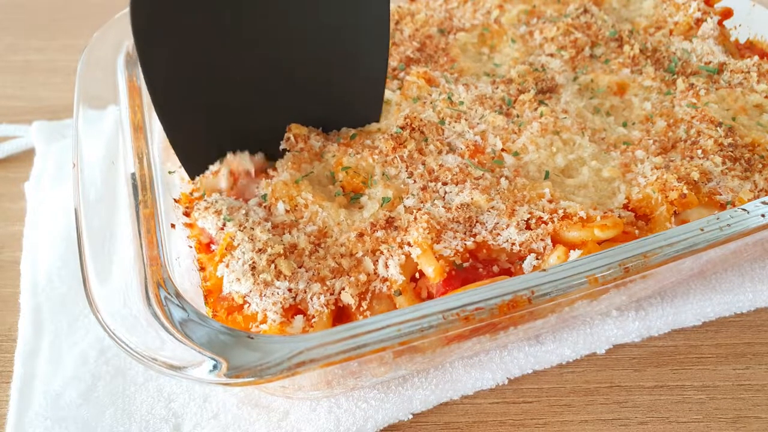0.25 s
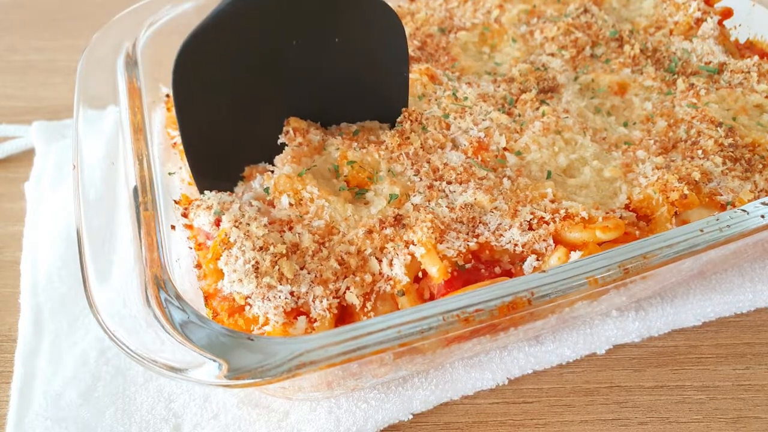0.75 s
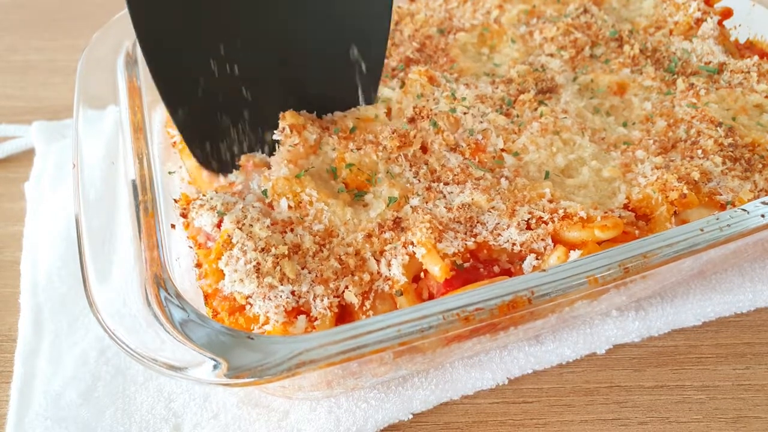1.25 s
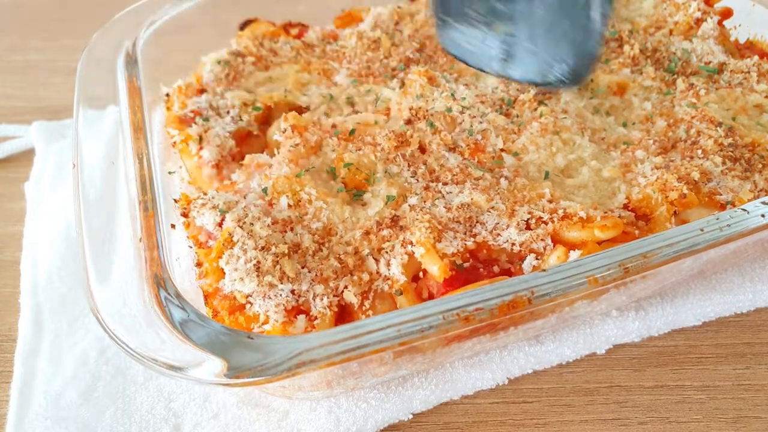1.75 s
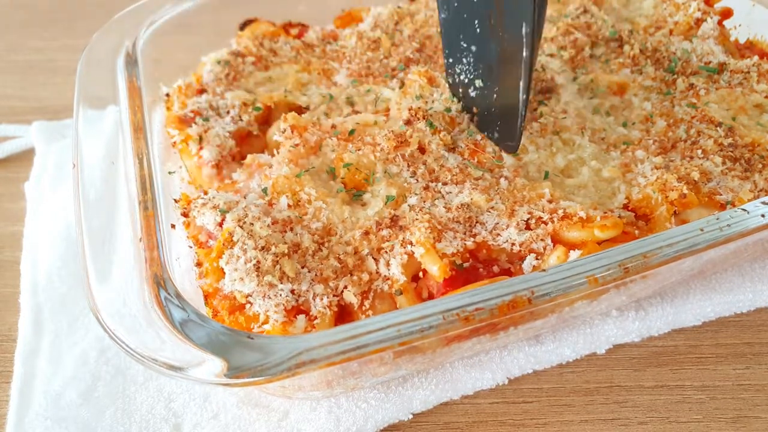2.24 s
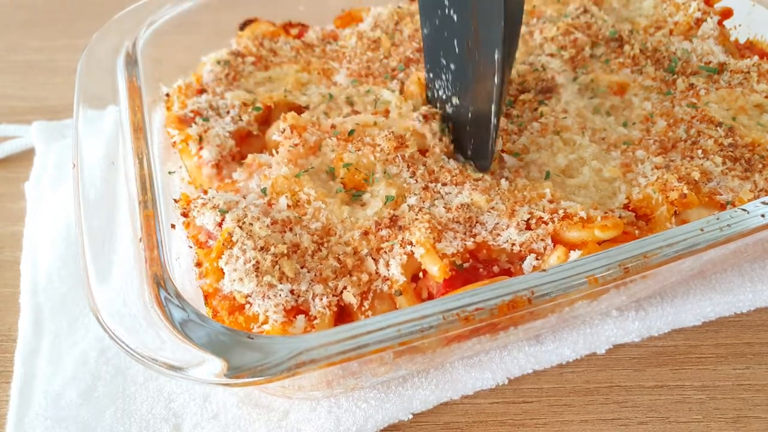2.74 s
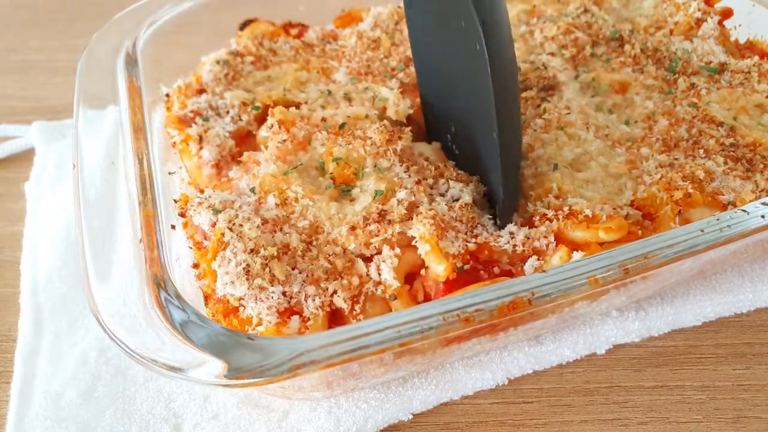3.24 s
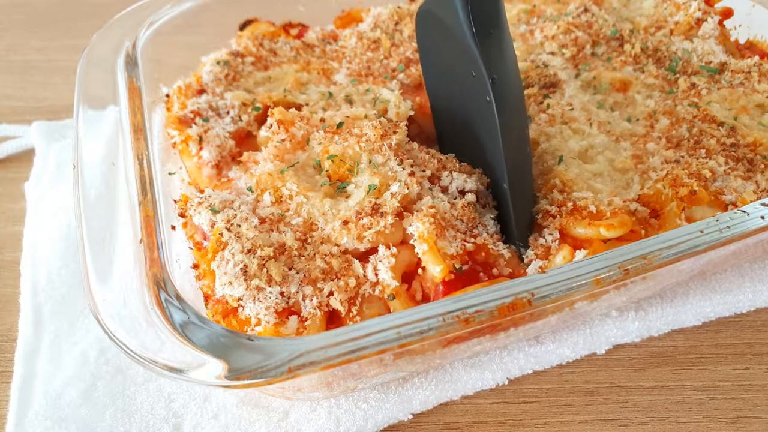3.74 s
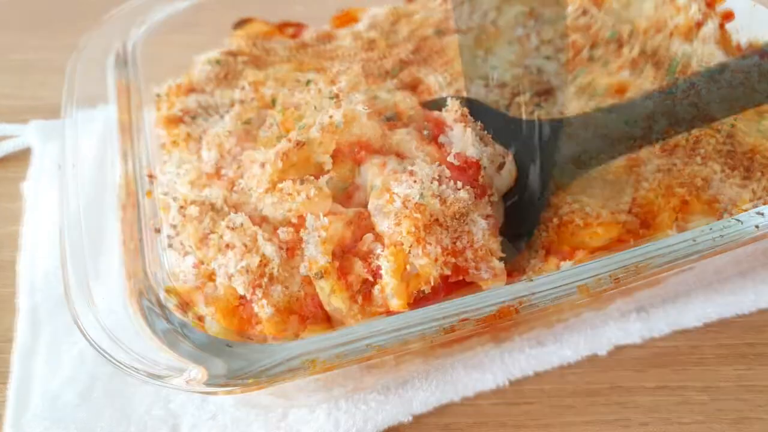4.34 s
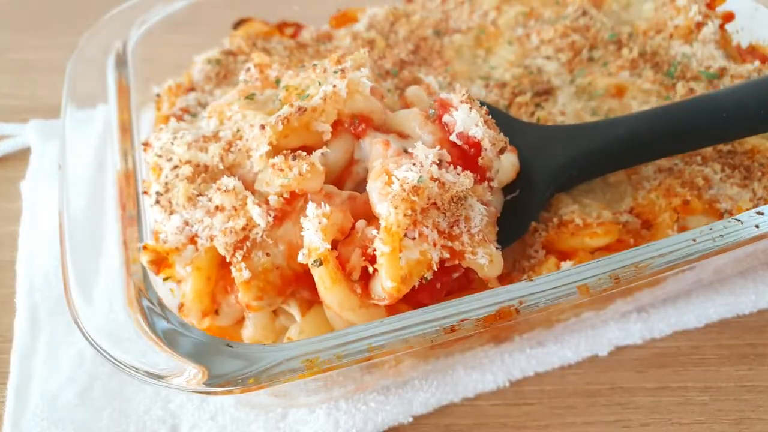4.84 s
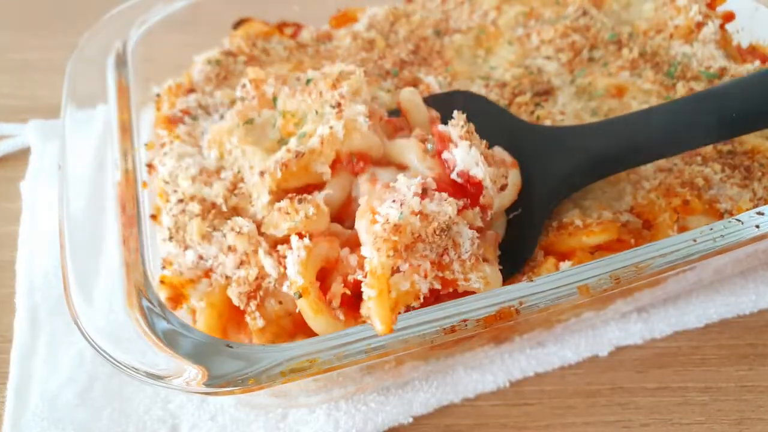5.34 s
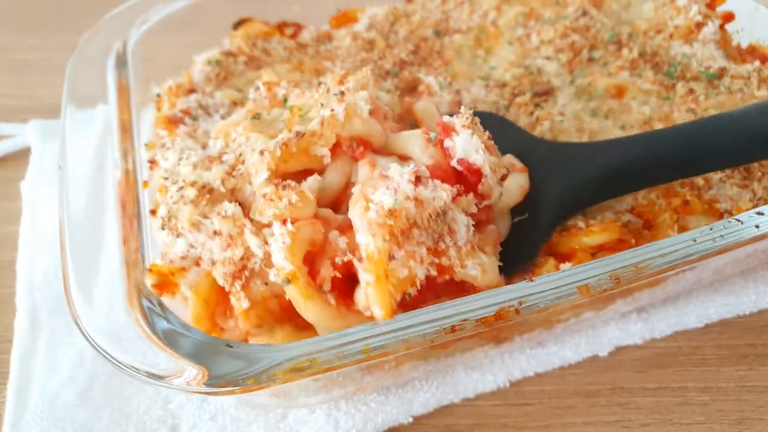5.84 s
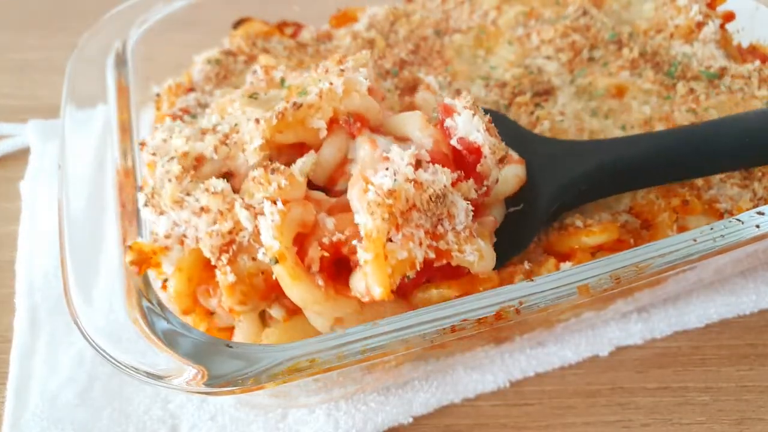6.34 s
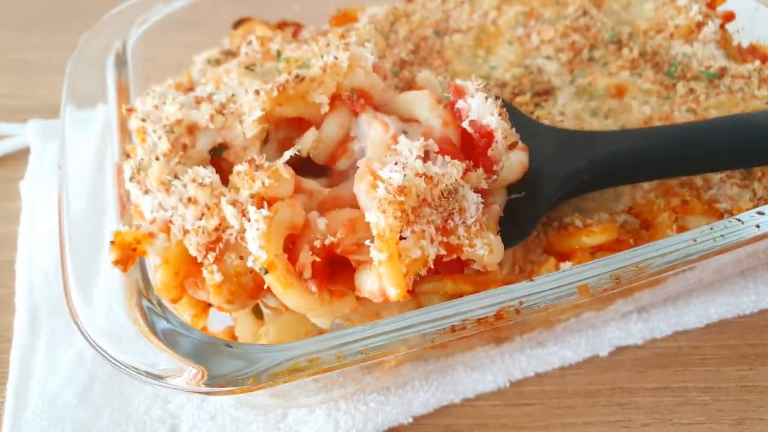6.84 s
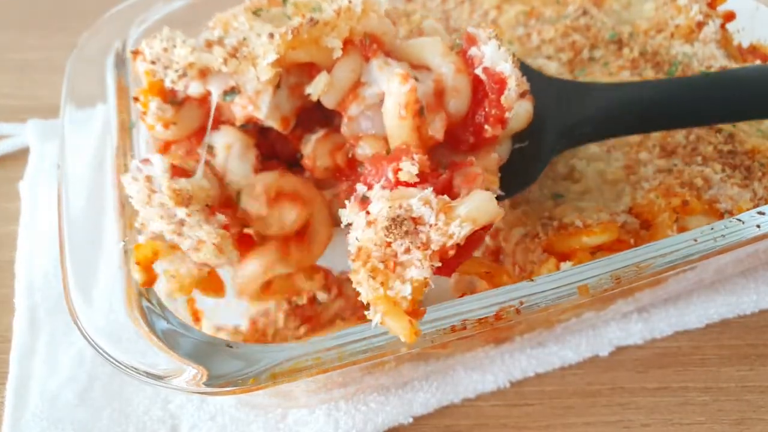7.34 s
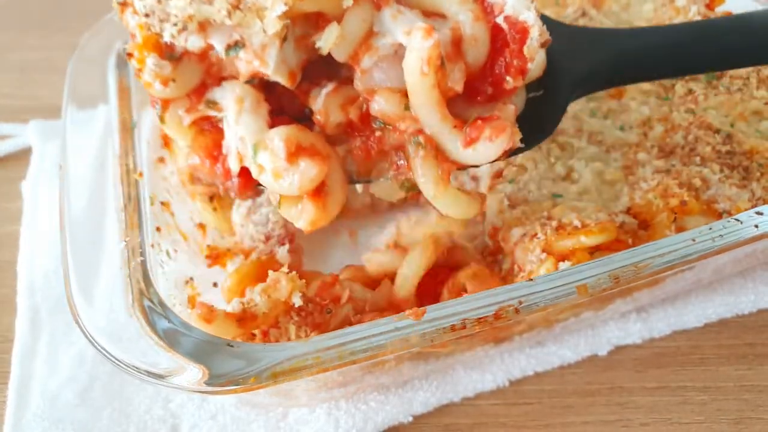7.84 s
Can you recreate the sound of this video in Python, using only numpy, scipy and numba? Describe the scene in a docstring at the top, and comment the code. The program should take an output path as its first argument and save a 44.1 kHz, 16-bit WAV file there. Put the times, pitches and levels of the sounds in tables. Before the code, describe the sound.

Close, brittle crunching of a crumb topping in two bursts, a tiny silent gap, then scattered crackles and wet sauce pops over faint sizzle.

```python
"""First comes a fine, dry crackle with short, sharp clicks: a silicone spatula cuts a crisp crumb crust in a glass dish.
Every breaking crumb is a set of tiny fading rings, over faint hollow knocks. The dish shudders, as noise through
narrow bands, when the blade reaches the glass, and pushes thump as low noise. After a brief silence holding one
tick, a wet scoop of pasta is lifted: sauce pops as short rings that glide up, soft food squashes as mid-pitched
noise, and quiet room tone and sizzle, made of coloured noise, lie beneath."""
import sys
import numpy as np
from scipy import signal
from scipy.fft import rfft, irfft
from scipy.io import wavfile
from scipy.ndimage import uniform_filter1d
from numba import njit

SR = 44100
rng = np.random.default_rng(int(sys.argv[2]) if len(sys.argv) > 2 else 0)


def to_linear_factor(level_db):
    """Convert decibel levels (scalar or array-like) to linear amplitude factors."""
    exponent = np.asarray(level_db, float) / 20
    return 10 ** exponent


def digitize_waveform(pressure):
    """Quantize a signal to 16-bit integers and store it at the path in sys.argv[1].

    Rows of a 2-D input are taken as channels; values are limited to [-1, 1].
    """
    field = np.atleast_2d(pressure).T
    bounded = np.clip(field, -1, 1)
    quanta = np.round(bounded * 32767).astype(np.int16)
    wavfile.write(sys.argv[1], SR, quanta)


N = 356328
T = np.arange(N) / SR  # time of each sample, s
SILENCE_START_S, SILENCE_END_S = 4.1675, 4.2605  # cutting before, scooping after

# the hand's work, one list for cutting and one for scooping:
# (t/s, crackle level/dB, deep crunch relative to crackle level/dB)
HAND_WORK = [
    [(0.0, -45.5, -9.5), (0.14, -39, -5.5), (0.47, -31.5, -5.5), (0.62, -39, -2), (0.75, -54, -7),
     (1.11, -49.5, -9.5), (1.14, -39.5, -12), (1.22, -44, -0.5), (1.29, -56, -11), (2.19, -50, -17),
     (2.27, -47, -12), (2.35, -51.5, -14), (2.56, -45.5, -5.5), (2.67, -49, -12), (2.95, -39, -5),
     (3.04, -39, -7), (3.18, -27.5, -7), (3.27, -27.5, -9), (3.5, -35, -1), (3.7, -39, -3.5),
     (3.84, -45, -9), (3.95, -30.5, -3.5), (4.16, -42, -10.5)],
    [(4.26, -42.5, -7.5), (4.48, -40, -10.5), (5.06, -42.5, -14), (5.34, -41.5, -20), (5.45, -29, -15),
     (5.5, -35, -10), (6.03, -35, -11.5), (6.18, -34, -14), (6.48, -37, -10.5), (6.8, -40, -13),
     (7.13, -44, -10), (7.25, -55.5, -22), (7.36, -43, -15), (7.53, -49, -13), (7.6, -40, -5.5),
     (7.85, -40, -6.5), (8.08, -45.5, -15)],
]
# single loud cracks: (t/s, peak level/dB, centre f/Hz, fall below centre/dB per octave, fall above/dB per octave)
LOUD_CRACKS = [(0.2064, -20, 3260, 5.8, 13), (0.2616, -18, 5680, 18, 29), (0.3518, -17.5, 5050, 9, 19),
               (0.3771, -16.5, 10900, 7, 2), (0.4397, -19.5, 3440, 23, 13), (0.4548, -13, 3240, 30, 15),
               (0.4797, -18, 3870, 13, 12), (0.4834, -13, 3240, 8.9, 9), (0.5011, -9.5, 3200, 5.6, 16),
               (0.525, -13.5, 3980, 9, 10), (0.5513, -21.5, 4480, 13, 30), (0.5685, -17.5, 4760, 1.6, 10),
               (0.575, -13, 3330, 27, 25), (0.6124, -17, 4350, 25, 34), (0.6614, -12, 3980, 14.4, 26),
               (0.7714, -22, 3240, 14, 14), (0.812, -28, 3220, 5, 15), (1.2068, -17.5, 3240, 13, 2.3),
               (1.2472, -23.5, 3270, 16, 1.8), (1.5146, -31, 5520, 7, 12), (1.7832, -30.5, 4100, 23, 19),
               (2.6786, -26.5, 5520, 9, 12), (2.7699, -17, 10900, 13, 2), (2.853, -25, 5050, 9.2, 5),
               (2.926, -20, 8600, 8.6, 3), (2.9796, -23, 2790, 2.2, 4), (2.996, -23, 5680, 9.4, 4.6),
               (3.095, -14.5, 5680, 5.7, 3.3), (3.142, -16, 2880, 2, 11), (3.184, -8.5, 2410, 2, 7),
               (3.188, -12, 1900, 2, 14), (3.2406, -16.5, 4480, 10, 13), (3.2571, -20, 4620, 10, 6.9),
               (3.2653, -25, 5520, 4.6, 10), (3.2899, -18, 4480, 7.5, 10), (3.3339, -11.5, 3440, 17, 11),
               (3.3434, -9.5, 3640, 16, 16), (3.3685, -11, 3870, 19, 34), (3.372, -15, 2550, 2, 10),
               (3.3945, -8.5, 5050, 8.1, 24), (3.4, -15.5, 4350, 7, 28), (3.4064, -18.5, 4480, 22, 31),
               (3.4128, -14, 3240, 9.4, 17), (3.4331, -11, 3750, 9.4, 14), (3.4705, -14, 3540, 15, 13),
               (3.5121, -11, 4230, 5, 8), (3.521, -14.5, 2960, 2, 8.5), (3.5383, -20.5, 2630, 2, 9),
               (3.5467, -21, 3640, 7, 21), (3.5838, -21, 3240, 9.4, 12), (3.595, -8, 4060, 8.5, 27),
               (3.64, -16, 5520, 15, 11), (3.6709, -15, 5000, 12.5, 25), (3.701, -24, 2410, 2, 3),
               (3.8819, -17.5, 5520, 16, 12), (3.8983, -20.5, 2090, 3, 7), (3.911, -20.5, 3870, 5, 10),
               (3.916, -16, 5050, 9.2, 24), (3.947, -14, 4170, 17, 6.4), (3.9565, -14, 1900, 2, 4),
               (4.0038, -16, 4760, 6.8, 4.8), (4.2731, -20, 4350, 17, 5.2), (4.3407, -20.5, 5680, 12, 11),
               (4.4003, -17.5, 3240, 30, 11), (4.5229, -24, 4350, 1.5, 6.5), (4.5323, -24, 4100, 12, 2),
               (4.5657, -13, 5680, 20, 19), (4.5755, -20, 4100, 15, 12), (4.6392, -24.5, 4230, 16, 1.8),
               (4.688, -25, 3980, 25, 1.7), (4.8372, -21, 4900, 8.1, 2), (4.886, -19.5, 5680, 7.1, 4),
               (5.0343, -15, 4800, 18.5, 20), (5.0782, -19, 5680, 9.1, 20), (5.1125, -24.5, 3870, 16, 2),
               (5.182, -27, 4930, 16, 12), (5.1901, -26.5, 4620, 16, 19), (5.2434, -27.5, 4480, 16, 13),
               (5.273, -18.5, 4600, 20, 12), (5.3252, -19.5, 4600, 20, 21), (5.354, -21, 4620, 21, 16),
               (5.3574, -18, 4480, 17, 12), (5.388, -18, 3950, 17, 8.7), (5.4203, -21, 4100, 7, 5),
               (5.4413, -16, 4350, 10, 2), (5.4452, -15, 9400, 6.8, 2), (5.449, -12.5, 4100, 12, 2),
               (5.4515, -10, 3240, 19, 11), (5.4694, -12, 3600, 18, 10), (5.4936, -20, 3980, 15, 10),
               (5.4982, -18, 3870, 15, 2), (5.5749, -18.5, 3980, 16, 22), (5.5923, -20, 5520, 2.2, 13),
               (5.6424, -23, 4900, 12, 13), (5.6591, -12.5, 5360, 11, 4), (5.6921, -21, 4480, 14, 2),
               (5.7081, -16, 3240, 11, 7.3), (5.7448, -15, 4480, 11.5, 27), (5.8341, -7.5, 4850, 13.4, 15),
               (5.9237, -10.5, 3440, 19, 11), (6.0037, -20, 3540, 11, 5.1), (6.027, -19.5, 3870, 23, 15),
               (6.0355, -15, 4900, 22, 34), (6.0908, -16, 4230, 13, 5), (6.1369, -23.5, 3240, 9, 11),
               (6.155, -11, 3440, 22, 2.7), (6.2902, -18.5, 3640, 18, 4.1), (6.2995, -14, 4100, 15, 7.7),
               (6.3446, -10.5, 3330, 13, 4.1), (6.4735, -25, 3900, 13, 6), (6.5135, -21, 9680, 6.2, 2),
               (6.5732, -19, 10900, 6.6, 2), (6.6328, -26.5, 4230, 21, 14), (6.6701, -21, 4350, 15, 12),
               (6.734, -23, 4480, 30, 7.2), (6.9089, -19.5, 4200, 16, 23),
               (6.9641, -14.5, 4440, 13.7, 14.5), (7.1284, -15, 3240, 17, 12),
               (7.4638, -21.5, 4480, 25, 13), (7.68, -26, 4480, 9, 34), (7.7097, -17, 3540, 11, 24),
               (7.7553, -17.5, 10900, 6, 2), (7.8026, -16.5, 3260, 18, 4.1), (7.8636, -21, 3240, 16, 4.1),
               (7.9917, -20.5, 5680, 30, 11)]
# air pockets popping in the sauce: (t/s, peak level/dB, f/Hz)
SAUCE_POPS = [(4.373, -39, 1370), (4.521, -44, 1660), (4.602, -33, 1210), (4.877, -42, 1230),
              (5.451, -30, 1050), (5.547, -28, 1320), (5.575, -34, 1230), (5.708, -41, 1150),
              (5.727, -30.5, 1270), (5.745, -26.5, 1340), (5.771, -32, 1320), (5.833, -31.5, 1300),
              (5.881, -28.5, 1220), (5.924, -30.5, 1160), (6.034, -37, 1220), (6.053, -25, 1215),
              (6.377, -36, 1330), (6.414, -37, 1250), (6.437, -36, 1200), (6.535, -39, 1240),
              (6.965, -36, 1220), (6.994, -42, 1250), (7.128, -33.5, 1400), (7.344, -39.5, 1290),
              (7.63, -37.5, 1280), (7.802, -44, 1410)]
# the same few rings sound with every break, grouped as deep, low, high and bright part: # (typical f/Hz,
# typical time to fall 60 dB/s, level within the part/dB)
BREAK_RINGS = [
    [(1520, 0.0023, -2.5), (2194, 0.0029, -1)],
    [(2853, 0.0038, -7.5), (3324, 0.0044, -5.5), (3660, 0.0039, -4.5)],
    [(5260, 0.0033, -7), (6060, 0.0029, -3.5)],
    [(8810, .002, -1.5), (10900, 0.0018, -8), (13300, 0.00098, -5)],
]
# low modes of the glass dish: (f/Hz, width scale/Hz, relative level for equal widths/dB)
DISH_MODES = [(223, 49, -9.5), (346, 28, -3.5), (505.7, 15, 6), (563, 40, -2), (634, 49, 3), (677, 35, -4),
              (787, 88, -5.5)]
# blade rubbing the glass: (start t/s, length/s, starting level/dB)
GLASS_RUBS = [(3.294, .095, -30.5), (3.428, 0.11, -38)]
# pushes that thump through dish and counter: (t/s, starting level/dB, time to fall 60 dB/s)
PUSH_THUMPS = [(.5, -40.5, 0.36), (1.21, -49, 0.27), (2.84, -59, .6), (3.23, -52, 3.1), (3.99, -39, 0.26),
               (5.93, -58, 0.92), (6.85, -54, 0.88), (7.38, -56, .6), (8.0, -51, .6)]
# sauce bubbling in the lifted scoop, the guide for its faint pops: (t/s, level/dB)
SCOOP_SAUCE = [(4.26, -62), (4.35, -60.5), (5.3, -64), (5.5, -47.5), (5.75, -45.5), (6.15, -48),
               (6.5, -50.5), (6.8, -59), (6.95, -51), (7.4, -51.5), (7.52, -57), (7.65, -50), (8.08, -54.5)]
# colour of room tone and sizzle, one list before and one after the silence: (f/Hz, relative level/dB per Hz)
KITCHEN_COLOURS = [(18, -43.5), (30, -16), (81, -5.5), (210, -4), (1250, -15), (1960, -1.5), (2830, -13.5),
                   (3490, 3.5), (4420, -15.5), (5900, 2), (7090, -11.5), (8980, -6), (14400, -14.5),
                   (16000, -22)], [(18, -37), (30, -12), (189, -7.5), (584, -12.5), (1010, -11),
                   (1280, -18), (2480, -7.5), (3670, -1), (4420, -12), (6210, 4.5), (7090, -11), (9220, -5),
                   (14000, -13), (16000, -27)]
# the scattered difference between the two microphone ports: (f/Hz, side relative to mid level/dB)
SIDE_COLOUR = [(60, -28), (110, -28), (200, -28), (380, -23), (700, -20), (1290, -44), (2380, -40),
               (4400, -41), (8120, -26.5), (15000, -10.5)]


def crackle(level_db, deep_db):
    """Countless small crumbs break, loosely bunched, with fewer middling ones; their level follows the hand."""
    # the bright part at -45 dB of crackle, cutting and scooping; harder work is duller
    bright_db = np.where(T < SILENCE_END_S, 1.0, 2.0) - 0.3746 * (level_db + 45)
    # the deeper the crunch, the weaker its high part
    high_db = -0.25 * (deep_db + 8.5)
    bunch = rng.standard_normal(2000)  # a random loudness for each 1/120 s

    def breaks(s, size_db, scatter_db):
        """Place crumbs at these times, with the loudness and colour of the work at that moment."""
        at = (s * SR).astype(int)
        own_db = level_db[at] + size_db + 1.44 * bunch[(s * 120).astype(int)]
        parts_db = (own_db + deep_db[at], own_db, own_db + high_db[at], own_db + bright_db[at])
        return crumbs(s, parts_db, scatter_db, detune=0.074)

    s, size_db = scatter(per_s=1700, spread_db=5.0, cap_db=15.0, count=22000)
    fine = breaks(s, size_db, scatter_db=4.0)
    s, size_db = scatter(per_s=130, spread_db=3.5, cap_db=8.5, count=1500)
    middling = breaks(s, size_db + 7, scatter_db=7.0)
    return fine + middling


def cracks():
    """Loud breaks, each with a weaker splinter just before or after; parts far from its pitch ring less."""
    s, peak_db, hz, below, above = np.transpose(LOUD_CRACKS)
    part_hz = [np.mean([mode[0] for mode in modes]) for modes in BREAK_RINGS]
    octaves = np.log2([centre / hz for centre in part_hz])
    parts_db = -np.where(octaves < 0, -below, above) * octaves
    parts_db = peak_db + parts_db - parts_db.max(axis=0)  # the strongest part has the crack's level
    splinter_s = s - 0.0016 + 0.0028 * rng.random(len(s))
    # a ring fades while it swells, so it must start above the peak that is heard
    main = crumbs(s, parts_db + 11.5, scatter_db=1.0, detune=0.048)
    splinters = crumbs(splinter_s, parts_db - 0.5, scatter_db=5.0, detune=0.04)
    return main + splinters


def crumbs(s, parts_db, scatter_db, detune):
    """Every break rings all these modes at once, each a little off in pitch and length; the breaks have little
    bass."""
    out = 0
    sign = np.sign(rng.standard_normal(len(s)))
    for modes, db in zip(BREAK_RINGS, parts_db):
        part_db = db + scatter_db * rng.standard_normal(len(s))
        for hz, t60, mode_db in modes:
            pitch_chance, length_chance = rng.standard_normal((len(s), 2)).T
            sign = -sign  # neighbouring modes start in opposite directions
            pitch = np.clip(hz * (1 + detune * pitch_chance), 200, 0.45 * SR)
            length = t60 * np.exp(0.14 * length_chance)
            out = out + grains(s, pitch, length, sign * to_linear_factor(part_db + mode_db), 0., 0.0003)
    return signal.sosfilt(signal.butter(3, 950, "high", fs=SR, output="sos"), out)


def pops_and_knocks(faint_level):
    """Air pockets open in the sauce, a few cycles that glide up, over many faint pops or hollow knocks."""
    t60 = 0.014  # s
    s, peak_db, hz = np.transpose(SAUCE_POPS)
    # started higher, since a pop fades while it swells
    loud = grains(s, hz, np.full(len(s), t60), to_linear_factor(peak_db + 6.5), 0.0034, 0.00024)
    s, size_db = scatter(per_s=1000, spread_db=5.5, cap_db=10.5, count=9000)
    hz = 1290 * (1 + 0.084 * rng.standard_normal(len(s)))
    size = faint_level[(s * SR).astype(int)] * to_linear_factor(size_db - 7.5)
    faint = grains(s, hz, np.full(len(s), t60), size, 0.0028, 0.00011)
    return loud + faint


def dish():
    """The blade sticks and slips on the glass floor, and this rough rubbing drives the low modes of the dish."""
    attack_s, release_s, sag_db_per_s = 0.0075, 0.03, 45
    grip = 0
    for start, length, db in GLASS_RUBS:
        since = T - start
        fade = np.interp(since, [-attack_s, 0, length, length + release_s], [0, 1, 1, 0])
        grip = grip + to_linear_factor(db - sag_db_per_s * np.clip(since, 0, length)) * fade
    # the rubbing noise jumps to a new random loudness every 200 samples
    jumps_db = 2.5 * np.repeat(rng.standard_normal(N // 200 + 1), 200)[:N]
    rub = rng.standard_normal(N) * to_linear_factor(jumps_db)
    ring = 0
    for hz, width, db in DISH_MODES:
        mode = unit(band(rub, hz - 0.7 * width, hz + 0.8 * width))
        ring = ring + to_linear_factor(db) * mode * np.sqrt(width)
    return unit(ring) * grip


def pasta(squash_db):
    """Soft food squashes under the blade; each push thumps through dish and counter over faint handling."""
    rise_s, handling_db = 0.027, -67
    # noise times noise is lumpier than plain noise
    squash = unit(band(rng.standard_normal(N) * rng.standard_normal(N), 358, 1000))
    thump = unit(band(band(rng.standard_normal(N), 32, 119), 26, 170))
    push = 0
    for start, db, t60 in PUSH_THUMPS:
        since = T - start
        push = push + to_linear_factor(db) * np.clip(since / rise_s, 0, 1) * 1000. ** (-np.maximum(since, 0) / t60)
    return squash * to_linear_factor(squash_db) + thump * (to_linear_factor(handling_db) + push)


def tick():
    """A lone tick inside the silence: two very short rings, the higher one weaker."""
    db = -37 + np.array([0, -8])
    return grains(np.full(2, 4.2392), np.array([3500., 9000]), np.full(2, 0.0015), to_linear_factor(db), 0., 0.0001)


def kitchen():
    """Quiet room tone and the faint sizzle of hot food, made of coloured noise that wavers a little."""
    before_colour, after_colour = KITCHEN_COLOURS
    before = unit(shape(rng.standard_normal(N), before_colour)) * to_linear_factor(-52)
    after = unit(shape(rng.standard_normal(N), after_colour)) * to_linear_factor(-45)
    steps = np.repeat(rng.standard_normal(N // 1500 + 1), 1500)[:N]
    waver_db = 1.73 * uniform_filter1d(steps, 1500)
    return np.where(T < SILENCE_END_S, before, after) * to_linear_factor(waver_db)


def tail(t60):
    """Reflections as a burst of noise that falls 60 dB in t60 seconds, scaled to energy 1."""
    t = np.arange(SR // 4) / SR
    burst = rng.standard_normal(len(t)) * 1000. ** (-t / t60)
    return burst / np.sqrt(np.sum(burst ** 2))


@njit
def grains(s, hz, t60, size, glide, rise_s):
    """Damped rings that swell for a moment; the pitch may glide up by a share each cycle."""
    out = np.zeros(N)
    for k in range(len(s)):
        z = size[k] + 0j  # a spinning arrow: its height is the sound
        turn = 2 * np.pi * hz[k] / SR
        fall = 1000. ** (-1 / (t60[k] * SR))
        first = int(s[k] * SR)
        for i in range(first, min(N, first + int(t60[k] * SR))):
            out[i] += z.imag * (1 - np.exp((first - i) / (rise_s * SR)))
            z *= fall * np.exp(1j * turn)
            turn *= 1 + glide * hz[k] / SR
    return out


def scatter(per_s, spread_db, cap_db, count):
    """Chance times, and sizes in dB: mostly faint, a few strong."""
    gap, size = rng.random((count, 2)).T
    s = np.cumsum(-np.log(gap) / per_s)
    keep = s < N / SR
    return s[keep], np.minimum(-spread_db * np.log(size[keep]), cap_db)


def curves(spans):
    """Join the lists of a table and draw each column as a curve, one value a sample."""
    s, *columns = np.transpose(np.concatenate(spans))
    return [np.interp(T, s, column) for column in columns]


def shape(x, points):
    """Colour a sound by (f/Hz, level/dB) points joined on a log frequency axis."""
    hz, db = np.transpose(points)
    f = np.maximum(np.arange(N // 2 + 1) * SR / N, 1)
    return irfft(rfft(x) * to_linear_factor(np.interp(np.log(f), np.log(hz), db)), N)


def unit(x):
    """Scale to an rms (average strength) of 1."""
    return x / np.sqrt(np.mean(x ** 2))


def band(x, lo_hz, hi_hz):
    """Keep mainly what lies between two frequencies."""
    return signal.sosfilt(signal.butter(2, [lo_hz, hi_hz], "band", fs=SR, output="sos"), x)


def scene():
    """All sources, a short kitchen tail, and two microphone ports close together."""
    level_db, deep_db = curves(HAND_WORK)
    crunch_db = level_db + deep_db
    cutting = T < SILENCE_END_S
    # while cutting, faint hollow knocks near 1.3 kHz follow the crunch; the lifted scoop bubbles on its own
    faint_level = np.where(cutting, to_linear_factor(crunch_db - 14), to_linear_factor(curves([SCOOP_SAUCE])[0]))
    squash_db = crunch_db + np.where(cutting, -12.5, -16.5)
    food = crackle(level_db, deep_db) + cracks() + pops_and_knocks(faint_level) + dish() + pasta(squash_db)
    echo = to_linear_factor(-11.5) * signal.fftconvolve(food, tail(t60=0.13))[:N]
    mid = food + echo + kitchen()
    # the ports differ by a scatter of reflections, and the right one takes a little more bass
    reflections = shape(signal.fftconvolve(mid, tail(t60=0.015))[:N], SIDE_COLOUR)
    side = reflections - to_linear_factor(-28) * band(mid, 20, 200)
    return np.array([mid + side, mid - side])


def roll_off(x):
    """The treble ends steeply here."""
    return signal.sosfilt(signal.butter(12, 16500, fs=SR, output="sos"), x)


def record(dry):
    """A cut to silence with one tick in it, the loudest peaks rounded, and the top rolled off."""
    cut = dry * ((T < SILENCE_START_S) | (T > SILENCE_END_S))
    rounded = np.tanh(1.197 * cut) / 1.06
    low_pass = signal.ellip(8, 0.2, 70, 15700, fs=SR, output="sos")  # steep, from 15700 Hz up
    mix = signal.sosfilt(low_pass, rounded + tick())
    return roll_off(mix)


dry = scene()
out = record(dry)
digitize_waveform(out)
```